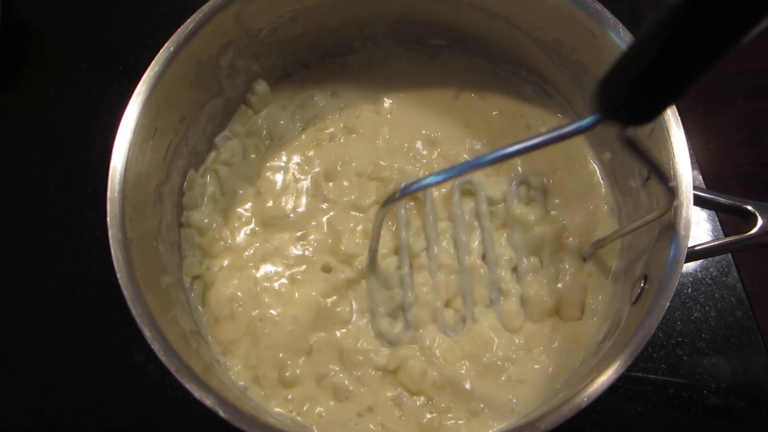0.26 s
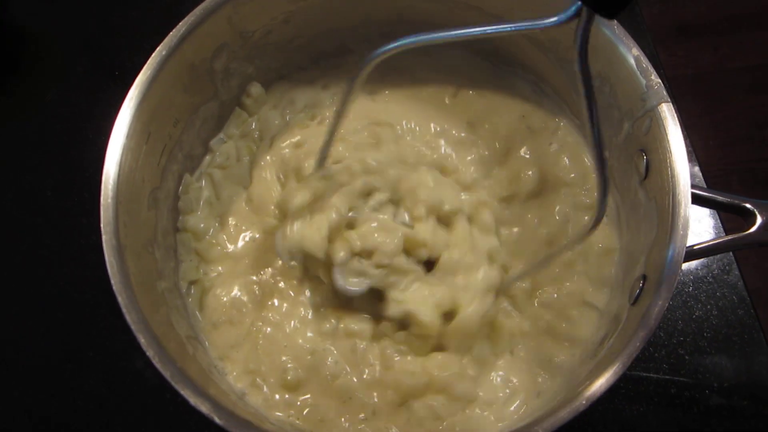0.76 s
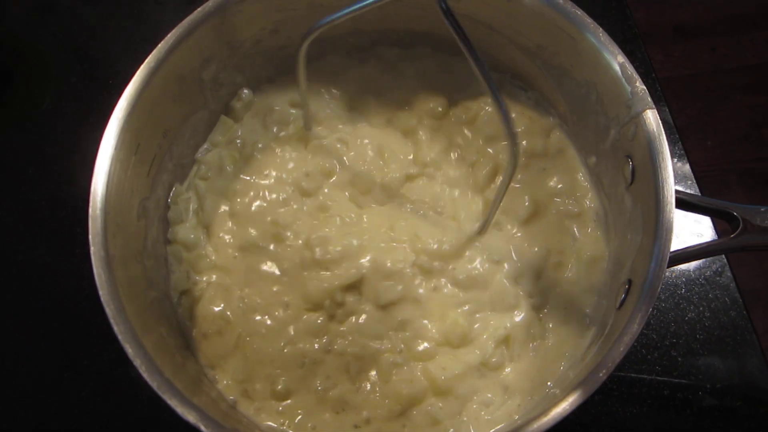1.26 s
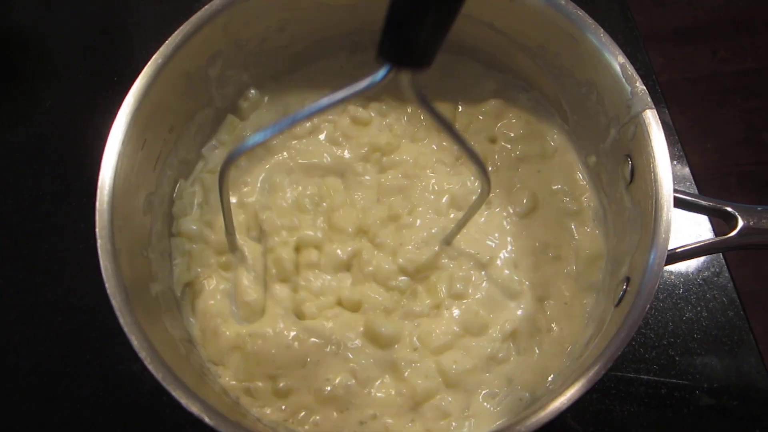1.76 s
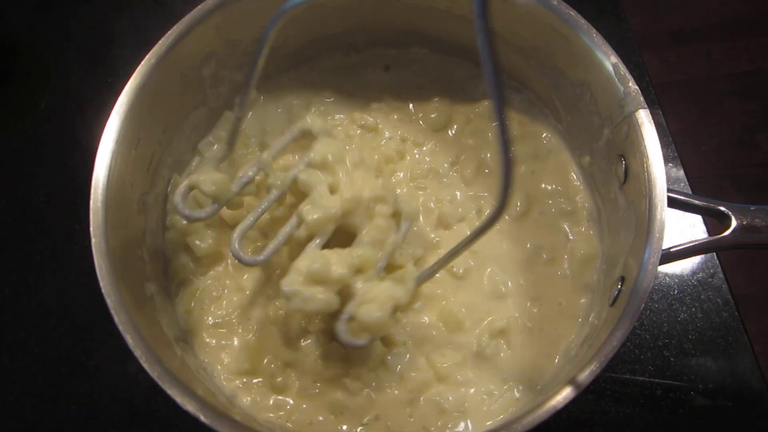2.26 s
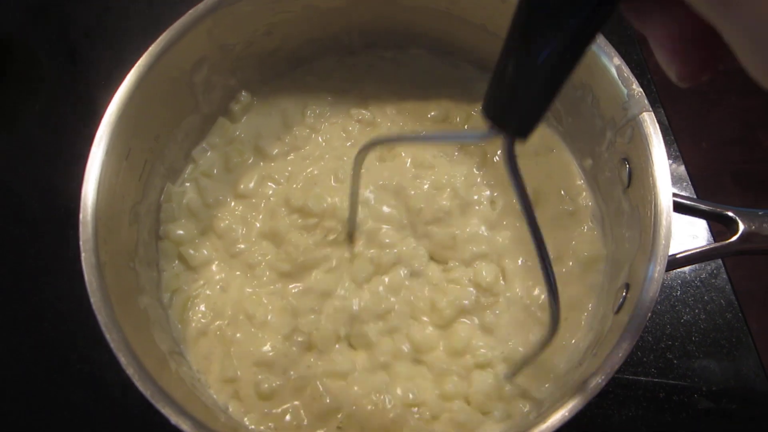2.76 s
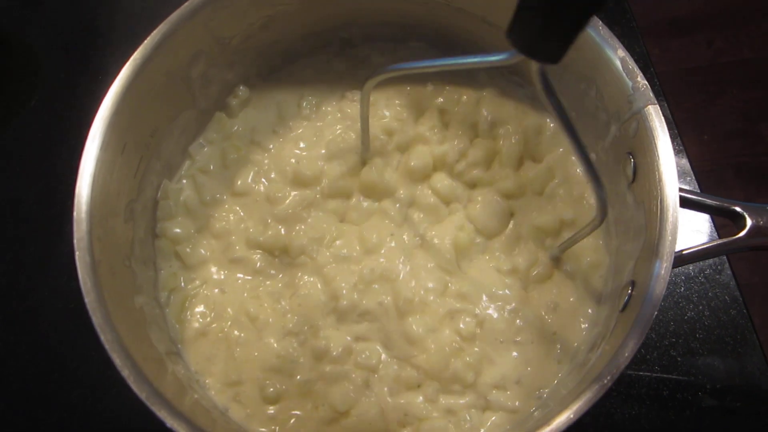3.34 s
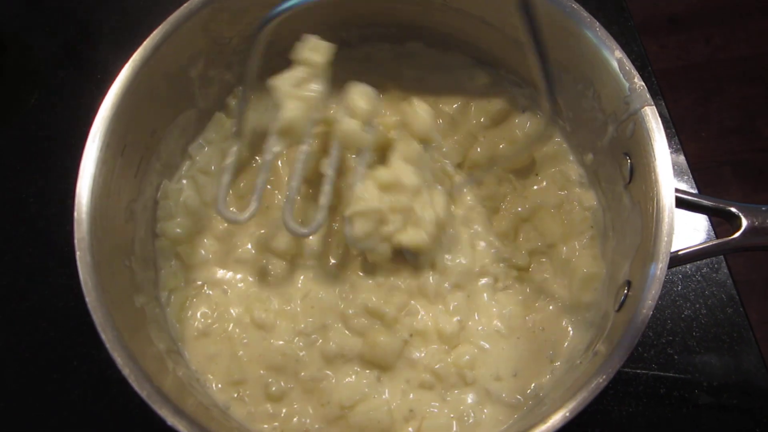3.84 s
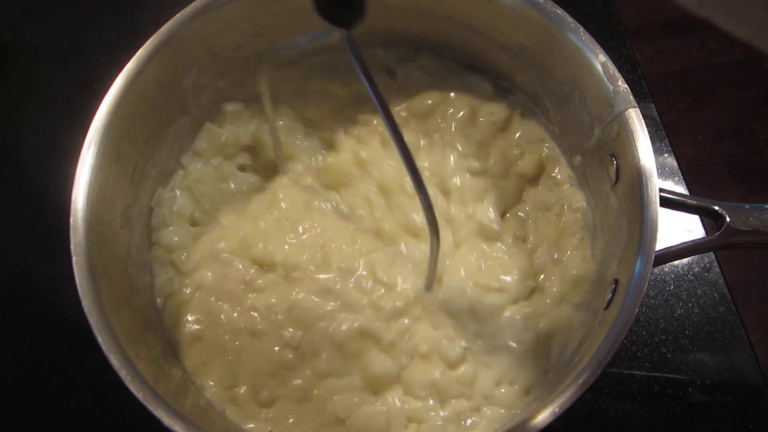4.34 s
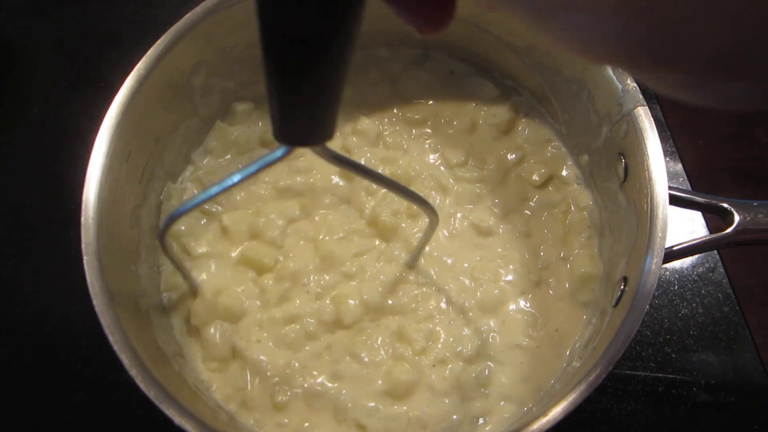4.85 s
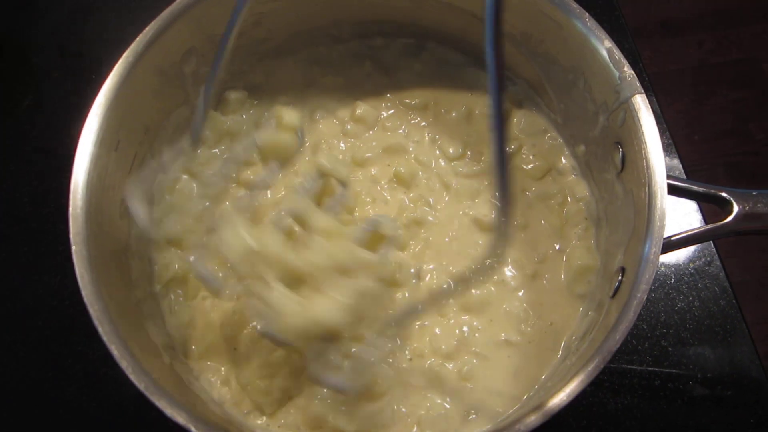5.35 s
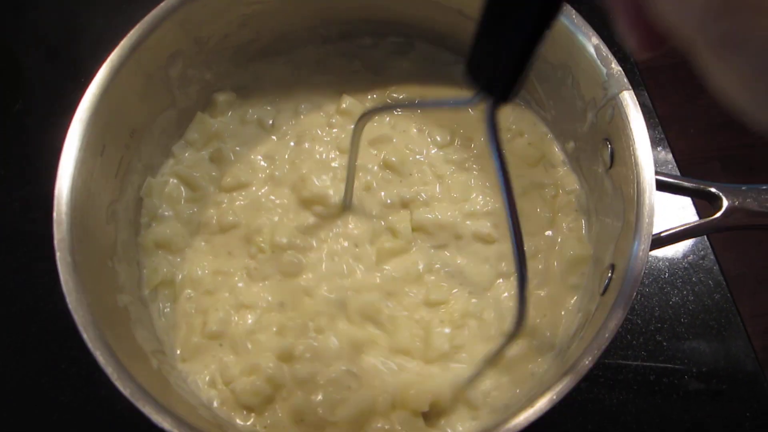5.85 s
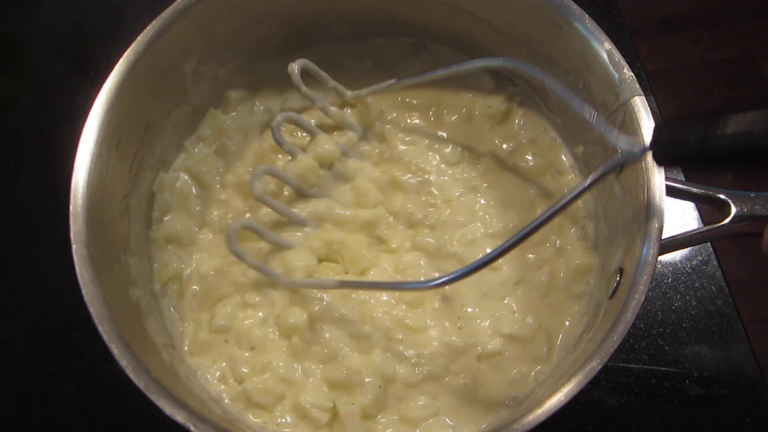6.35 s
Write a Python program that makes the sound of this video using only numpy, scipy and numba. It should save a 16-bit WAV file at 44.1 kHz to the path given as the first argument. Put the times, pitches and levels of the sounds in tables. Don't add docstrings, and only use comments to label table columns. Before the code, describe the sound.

Bright clanks of wire on a pan wall come roughly every half second to a second, the loudest near the start, the middle and late. Between them are swelling scrapes, wet smacks, small bubbling pops and soft thuds through heavy mash. One tiny squeak comes before five seconds. Close microphone, short room tail, steady appliance hum and broad hiss underneath.

```python
import sys
import numpy as np
from scipy import signal
from scipy.fft import rfft, irfft
from scipy.io import wavfile
from scipy.ndimage import uniform_filter1d
from numba import njit

SR = 44100
rng = np.random.default_rng(int(sys.argv[2]) if len(sys.argv) > 2 else 0)


def how_loud(loudness_db):
    steps = np.asarray(loudness_db, float) / 20
    return 10 ** steps


def bounce(signal):
    frames = np.transpose(np.atleast_2d(signal))
    limited = np.clip(frames, -1, 1)
    pcm = np.round(limited * 32767).astype(np.int16)
    wavfile.write(sys.argv[1], SR, pcm)


N = 291501

# frequency in Hz, level in dB.
HUM = [(59.2, -66), (236.9, -53), (296.1, -61), (414.5, -68.5), (1128, -66.5)]
# frequency in Hz, density in dB per Hz.
AIR = [(15, -43), (25, -0.5), (182, -1), (238, 0.5), (349, -3), (746, -14), (1430, -11), (2040, -13.5),
       (4990, -19.5), (11900, -24.5), (15500, -34), (17500, -31)]
# time in seconds, level in dB.
RECOVERY = [
    (0.181, 2.5),
    (.3, -1.5),
    (1, 2.5),
    (2.4, 3),
    (2.5, -1.5),
    (3.2, -1),
    (4.3, -0.5),
    (5.4, -0.5),
    (6.61, -1.5),
]

# frequency in Hz, level in dB, T60 in seconds.
WALL_MODES = [(754, -11, .4), (1100, -10, .35), (1174, -13, .3), (1351, -13, .28), (1631, -16, .3),
              (1825, -10, .14), (2030, -16, .15), (2062, -3, .45), (2622, -9, .14), (2800, -13, .12),
              (3240, -12, .12), (3801, -14, .2), (4124, -16, .22), (5168, -17, .25), (7133, -20, .18),
              (7870, -18, .2), (8721, -20, .15), (9981, -22, .15)]
# frequency in Hz, width in Hz, level in dB.
GRID_MODES = [(3800, 39, -11), (5060, 300, 8.5), (5340, 180, -5.5), (6340, 700, 7), (7000, 290, -9),
              (7670, 210, 7), (8225, 180, 8), (9030, 150, 8.5), (9920, 260, 8), (10400, 150, -10.5),
              (11400, 140, -0.5), (12880, 140, -4)]
# frequency in Hz, width in Hz, level in dB.
RUB_MODES = [(2020, 91, -21), (1980, 48, 10), (2400, 30, -3.5), (3000, 82, -6.5), (3196, 110, 7.5)]
# frequency in Hz, width in Hz, level in dB.
BOTTOM_MODES = [(696, 190, 3), (1000, 370, -6)]

# time in seconds, level in dB.
STIR = [(0.0, -56.5), (1.97, -52), (2.34, -59), (2.69, -48), (2.93, -59), (3.24, -61.5), (3.44, -56.5),
        (3.96, -57.5), (4.23, -47.5), (4.51, -58.5), (4.82, -55.5), (5.43, -59.5), (5.71, -54.5),
        (5.96, -68), (6.61, -55.5)]
# peak time in seconds, build-up in seconds, release in seconds, hiss in dB, wall share in dB.
PRESSES = [(0.491, .03, 0.0067, -35.5, -8.5), (0.569, 0.027, 0.045, -42.5, 0.5),
           (1.195, 0.06, 0.023, -39.5, 3), (1.255, 0.04, 0.032, -28, 5), (1.973, 0.037, 0.038, -34, 11),
           (2.095, 0.03, 0.0052, -48, -7), (2.638, 0.028, 0.03, -39, -5.5), (2.696, 0.051, .003, -43, -2),
           (2.877, 0.17, 0.016, -42, -0.5), (3.608, 0.15, 0.1, -48, 2), (4.283, 0.014, 0.0072, -35, -14),
           (4.2979, 0.014, 0.0085, -18.5, -7), (4.726, 0.012, 0.062, -53.5, 11.5),
           (4.945, 0.042, 0.034, -40, 1), (4.956, 0.0093, .03, -49.5, 15), (5.587, 0.015, 0.015, -22.5, -8),
           (5.855, 0.039, 0.047, -42, 2.5), (6.346, .02, 0.12, -47, -4.5)]
# start in seconds, length in seconds, hiss in dB, loss over the slide in dB, wall share in dB.
SLIDES = [(0.196, 0.12, -45.5, 13, 9.5), (0.947, 0.058, -58.5, -7.5, 2.5), (1.146, 0.053, -51.5, 5, -2),
          (1.202, 0.044, -45.5, 7, 12.5), (1.605, 0.089, -65, 1.5, 5), (1.872, 0.066, -56, -6.5, 10.5),
          (1.987, 0.13, -50, 11, -5), (2.448, 0.16, -42, 10.5, -0.5), (2.74, 0.045, -72, 7, 10),
          (3.22, 0.13, -40, 13, -7), (3.445, 0.036, -48, -3, 1.5), (4.055, 0.12, -61.5, -13.5, -3),
          (4.188, 0.097, -51, -11, -1.5), (4.336, 0.062, -42.5, 32, 2), (4.802, 0.05, -65, 3, 12),
          (4.997, 0.038, -57.5, 1, 14), (5.451, 0.1, -38.5, 17, 5), (5.769, 0.039, -45.5, 0.5, 5.5),
          (6.264, 0.11, -48, 3, -0.5), (6.524, 0.08, -48.5, 21.5, 8)]
# start in seconds, brightest Hz, tip sizzle in dB.
PLACES = [(0, 4500, 4.5), (.45, 4350, 2), (.55, 6170, 0.5), (.9, 6300, 2), (1.15, 8400, 5),
          (1.2, 7640, 0.5), (1.6, 7000, 6), (1.86, 6600, 5), (1.985, 5200, -5), (2.07, 9800, 1.5),
          (2.44, 4000, -1), (2.6, 6400, -2), (2.7, 9530, -1.5), (3.2, 3970, -4.5), (3.4, 7000, -0.5),
          (3.5, 7350, -4), (4.04, 7000, -0.5), (4.18, 10200, 0.5), (4.26, 6160, 0), (4.33, 5500, -7),
          (4.7, 5800, 8.5), (4.89, 10300, 1), (4.99, 7000, 5), (5.44, 4200, 0.5), (5.54, 6050, -9),
          (5.76, 4930, -9), (5.8, 7200, 0.5), (6.26, 6550, 3), (6.32, 8000, -6), (6.5, 5000, -0.5)]

# start in seconds, peak in dB, pitch
# in Hz.
CRACKLES = [(0.052, -40, 4120), (0.1066, -30.5, 4100), (0.13, -39.5, 3800), (0.623, -34, 7200),
            (0.8203, -31.5, 5550), (0.879, -40.5, 5700), (1.4145, -31.5, 4280), (1.45, -29.5, 3480),
            (1.485, -31, 3840), (1.5285, -38, 3580), (1.6017, -36, 9000), (1.667, -30.5, 7360),
            (1.8487, -30.5, 5600), (2.0367, -15.5, 4500), (2.0674, -24, 6300), (2.161, -31, 10000),
            (2.312, -28.5, 5230), (2.3394, -33.5, 5160), (2.357, -35.5, 4600), (2.9604, -37.5, 5390),
            (3.0508, -32.5, 4200), (3.9193, -33, 7000), (4.5505, -33, 6200), (5.155, -48, 11000),
            (5.363, -39, 4500), (6.004, -42, 4500), (0.4589, -41, 6280), (0.8614, -49, 5000),
            (1.0435, -38, 4000), (1.708, -37, 4000), (2.181, -44, 9500), (2.188, -38, 3000),
            (2.296, -49.5, 12000), (2.363, -34, 6000), (2.521, -41, 13000), (3.7628, -43, 5000),
            (3.8097, -38.5, 13000), (4.1465, -32, 6440), (4.5376, -36, 3310), (5.008, -29.5, 2860),
            (5.257, -46, 11000), (5.356, -52, 8000), (5.368, -43, 9000), (5.437, -33, 6000),
            (5.789, -24, 7000), (5.941, -57, 12000), (5.97, -53, 10500), (5.982, -46, 12500),
            (5.997, -50, 12000),
            (0.1762, -32, 4800), (0.18, -29, 5200), (0.962, -24.5, 2400), (0.979, -22, 6270),
           (0.993, -22, 7000), (3.203, -49, 10000), (4.453, -29.5, 4160), (4.721, -30.5, 2870),
           (4.74, -39, 3980), (5.678, -60, 2200), (6.239, -43, 5120),
            (1.4, -36, 4000), (1.42, -39, 9900), (1.436, -42, 13000), (1.5035, -44, 5000), (1.508, -46, 10500),
         (1.535, -36, 3000), (1.54, -38, 11000), (1.545, -47, 3520), (1.606, -37, 8500),
         (1.611, -41, 13000), (1.6183, -35, 4370), (1.626, -44, 10000), (1.639, -34, 3320),
         (1.65, -34, 11000), (1.657, -35, 2500), (1.673, -47, 12000), (1.681, -32, 2450),
         (1.6846, -41, 4500), (1.725, -41, 5500), (1.737, -42, 5000), (4.003, -42, 9000),
         (4.008, -41, 11000), (4.4148, -36, 7000), (4.427, -41, 7500), (4.462, -42, 13500),
         (4.476, -39, 14000), (4.481, -38, 11000), (4.561, -37, 7000), (4.568, -39, 5900),
         (4.618, -40, 12000), (4.6413, -44, 3000), (4.694, -41, 9900), (4.76, -42, 7000),
         (4.779, -35, 6500), (4.892, -46, 5000), (2.654, -22, 2610), (2.757, -41.5, 9000),
         (2.762, -41.5, 13000), (2.918, -42.5, 9000), (2.941, -43.5, 12000), (3.677, -37, 9500),
         (3.722, -49, 13000)]
# start in seconds, peak in dB.
POPS = [(0.788, -35.5), (1.5658, -34.5), (1.634, -35), (2.241, -33), (3.1104, -34), (3.735, -35.5),
        (3.781, -37), (3.847, -36), (4.589, -36), (4.609, -38), (4.693, -40), (4.849, -37), (5.24, -42),
        (5.325, -37), (5.396, -38)]
# start in seconds, length in seconds, film count.
LIFTS = [
    (0, .18, 8),
    (.945, .1, 16),
    (1.38, .37, 16),
    (3.7, .25, 5),
    (4.4, .3, 8),
]

# start in seconds, peak in dB, brightest Hz, dull share in dB, wall ring in dB.
KNOCKS = [(0.194, 2.5, 4570, -25.5, -28.5), (0.3401, -4.5, 7600, -44, -32), (1.2624, -4, 8800, -41, -22),
          (1.9872, -9.5, 9400, -42, -18), (2.4273, 5, 7640, -54, -17), (2.9012, -12, 12000, -30, -31.5),
          (3.2068, 3, 8240, -54, -18), (3.5124, -7, 9500, -14.5, -26), (4.0358, -11.5, 6400, -10, -22),
          (4.3337, -2.5, 9600, -31, -26), (4.342, -7, 9300, -8, -49), (4.7877, -8, 8600, -63, -21.5),
          (5.449, -0.5, 3800, -19, -20), (6.2573, -3, 8500, -21.5, -31)]
# start in seconds, peak in dB, dull share in dB, wall ring in dB.
TAPS = [(0.519, -17.5, -9.5, -10), (0.5368, -13, -9, -12), (1.1439, -13.5, -8, -13),
        (1.7686, -14.5, -12, -15.5), (2.543, -18.5, -2.5, -10.5), (2.7222, -21, -2, -17),
        (2.7738, -19.5, -6, -15), (3.3483, -15.5, -14.5, -18.5), (3.482, -27, -14, -8.5),
        (3.6, -24, 2, -17), (4.1094, -25, -34, -8.5), (5.5665, -19, -12, -9), (5.7768, -13, -21, -11.5),
        (6.354, -20.5, -28.5, -8.5), (6.364, -29, -18, -6), (6.5235, -19, -14, -9)]
# start in seconds, peak in dB, dull share in dB, wall ring in dB.
SMACKS = [(0.295, -32, -11, -16), (0.9498, -25.5, -23, -11.5), (1.204, -18.5, 0.5, -2),
          (1.693, -44, 11, -15), (1.803, -45, 4, -18.5), (2.7143, -14.5, -9, -11.5), (3.46, -25, -27, -2),
          (3.588, -21, 3.5, -7.5), (3.9926, -23, -30, -16), (4.468, -30, 3.5, -27), (4.8044, -33, 8, -30.5),
          (4.9514, -20.5, -13, -12.5), (5.4277, -23.5, -13, -21), (5.725, -25.5, 7, 3),
          (5.7391, -10.5, -5.5, -10.5)]
SMACK_HZ = 2750

# start in seconds, peak in dB, pitch in Hz, T60 in seconds.
THUDS = [(0.197, -21, 995, 0.025), (0.591, -30, 730, 0.021), (1.08, -33, 740, 0.029),
         (1.201, -30.5, 1173, 0.18), (1.245, -24.5, 1183, 0.069), (1.333, -27.5, 756, 0.033),
         (1.695, -30, 624, 0.042), (1.767, -29.5, 1240, 0.022), (1.804, -24, 1070, 0.011),
         (1.96, -29.5, 1200, 0.13), (1.989, -26.5, 1250, 0.021), (2.43, -26.5, 1030, 0.14),
         (2.714, -17.5, 1120, 0.016), (2.823, -30, 682, 0.049), (3.208, -27, 749.4, 0.19),
         (3.532, -32.5, 625, 0.036), (3.586, -20.5, 782, 0.03), (3.597, -21.5, 733, 0.058),
         (4.213, -35.5, 1140, 0.013), (4.335, -24.5, 1220, 0.017), (4.791, -32.5, 723, 0.11),
         (4.834, -31, 1130, 0.016), (4.951, -29.5, 1177, 0.046), (5.176, -42, 704, 0.075),
         (5.515, -27, 687, 0.035), (5.724, -17, 656, 0.048), (5.742, -10.5, 720, 0.022),
         (5.792, -23, 780, 0.03), (6.26, -26, 1015, 0.038), (6.522, -30, 696, 0.12)]
# start in seconds, peak in dB, T60 in seconds.
BUMPS = [
    (1.241, -39, 0.34),
    (2.715, -29.5, 0.19),
    (3.212, -44, 0.087),
    (4.336, -35.5, 0.13),
    (5.74, -27.5, 0.34),
]
# time in seconds, pitch in Hz, level in dB.
SQUEAK = [
    (4.69, 715, -65),
    (4.75, 731, -31.5),
    (4.765, 780, -37.5),
]


def level(x, db):
    return x * how_loud(db) / np.sqrt(np.mean(x ** 2))


def band(x, hz, width_hz):
    centre = min(hz, 0.42 * SR)
    sharpness = max(hz / width_hz, 0.4)
    return signal.lfilter(*signal.iirpeak(centre, sharpness, fs=SR), x)


def span(x, lo_hz, hi_hz):
    return signal.sosfilt(signal.butter(3, [lo_hz, hi_hz], "bandpass", fs=SR, output="sos"), x)


def fade(t, t60):
    return np.exp(-np.log(1000) * t / max(t60, 0.002))


def add(out, s, x, db):
    i = int(s * SR)
    x = x[:N - i]
    out[i:i + len(x)] += how_loud(db) * x / np.max(np.abs(x))


def walk(rate):
    k = int(SR / rate)
    held = np.repeat(np.clip(rng.standard_normal(N // k + 1), -1.5, 1.5), k)
    return 2.43 * uniform_filter1d(uniform_filter1d(held, k), k)[:N]


def kitchen_air():
    t = np.arange(N) / SR
    lines = sum(how_loud(db - 0.5 + 0.5 * walk(14)) * np.sin(2 * np.pi * f * t + 0.089 * walk(3.2)) for f, db in HUM)
    hz, db = np.transpose(AIR)
    bin_hz = np.arange(N // 2 + 1) * SR / N
    shape = how_loud(np.interp(np.log(bin_hz + 1), np.log(hz), db))
    rush = irfft(rfft(rng.standard_normal(N)) * shape, N)
    return lines + how_loud(1.5 * walk(6.3)) * level(rush, -58)


def grit(rate, flicker_db):
    size = how_loud(3 * np.minimum(rng.exponential(size=N), 3))
    slips = (rng.random(N) < rate / SR) * rng.standard_normal(N) * size
    smooth = 0.64 * rng.standard_normal(N)
    return how_loud(flicker_db * walk(90)) * (level(slips, 0) + smooth)


def spot(lo_hz, hi_hz, count=40):
    t = np.arange(3000) / SR
    hz = lo_hz * (hi_hz / lo_hz) ** rng.random((count, 1))
    modes = np.sin(2 * np.pi * hz * t)
    ring = rng.standard_normal(count) @ modes * fade(t, 0.02)
    return ring / np.sqrt(np.sum(ring ** 2))


def body(x, peaks, lo_hz, hi_hz, between_db, patchy_db):
    modes = sum(how_loud(db + patchy_db * walk(18)) * band(x, f, 1.4 * w)
                for f, w, db in peaks if lo_hz < f < hi_hz)
    dense = sum(signal.oaconvolve(how_loud(patchy_db * walk(15)) * x, spot(lo_hz, hi_hz))[:N] for _ in range(5))
    return level(span(modes + how_loud(between_db - 20) * dense, lo_hz, hi_hz), 0)


def strokes():
    swell_db = 18
    rows = []
    for s, up, down, db, wall_db in PRESSES:
        rows.append(([s - up, s, s + down], [db - swell_db, db, db - swell_db], wall_db))
    for s, length, db, loss, wall_db in SLIDES:
        rows.append(([s, s + length], [db, db - loss], wall_db))
    return rows


def drag():
    t, out = np.arange(N) / SR, np.zeros(N)
    touch_s, lift_s = 0.0051, 0.0063
    slips = grit(5000, 1.5)
    hiss = body(slips, GRID_MODES, 3600, 7970, 1, 2.5)
    sizzle = body(slips, GRID_MODES, 7500, 16000, -2, 2.5)
    rub = body(grit(1500, 2), RUB_MODES, 1600, 3900, 1, 2.5)
    mutter = body(grit(1200, 0.6), BOTTOM_MODES, 471, 1250, -7, 1.5)
    for s, db, wall_db in strokes():
        near = slice(int((s[0] - touch_s) * SR), int((s[-1] + lift_s) * SR))
        landing = (t[near] - s[0]) / touch_s + 1
        lifting = (s[-1] - t[near]) / lift_s + 1
        touch = np.clip(np.minimum(landing, lifting), 0, 1)
        hiss_db = np.interp(t[near], s, db)
        middle = (s[0] + s[-1]) / 2
        _, hz, tip_db = [row for row in PLACES if row[0] <= middle][-1]
        sizzle_db = -3.5 + tip_db + 0.21 * (hiss_db + 50.5)
        wire = level(hiss[near], 0) + how_loud(sizzle_db) * level(sizzle[near], 0)
        wire = how_loud(-3.5) * (wire + how_loud(4) * band(wire, hz, 0.2 * hz))
        out[near] += touch * how_loud(hiss_db) * (wire + how_loud(wall_db) * level(rub[near], 0))
    return out + how_loud(np.interp(t, *np.transpose(STIR))) * mutter


def crackles():
    chance = rng.random((120, 3))
    faint_s = chance[:, 0] * (N / SR - 0.02)
    faint = np.c_[faint_s, -55 + 12 * chance[:, 1] ** 2, 2500 * 5 ** chance[:, 2]]
    torn_s = np.concatenate([s + length * rng.random(films) for s, length, films in LIFTS])
    chance = rng.random((len(torn_s), 2))
    torn = np.c_[torn_s, -48 + 11 * chance[:, 0] ** 2, 2200 * 5 ** chance[:, 1]]
    pockets = [(s, db, 2720) for s, db in POPS]
    bursts = [*CRACKLES, *pockets, *faint, *torn]
    out, t = np.zeros(N), np.arange(600) / SR
    for s, db, hz in bursts:
        push = rng.standard_normal(len(t)) * fade(t, 0.0058)
        pitched = band(band(push, hz, 0.8 * hz), hz, 0.8 * hz)
        add(out, s, span(pitched + how_loud(-15) * push, 1300, 16000), db)
    return out


def contacts():
    rows = [(s, db, hz, dull, 0.032, ring) for s, db, hz, dull, ring in KNOCKS]
    rows += [(s, db, 7600, dull, 0.027, ring) for s, db, dull, ring in TAPS]
    return rows + [(s, db, SMACK_HZ, dull, 0.036, ring) for s, db, dull, ring in SMACKS]


def ticks():
    out, t, long = np.zeros(N), np.arange(4096) / SR, np.arange(16000) / SR
    f, mode_db, mode_t60 = np.transpose(WALL_MODES)
    decay = np.exp(-np.log(1000) * long / mode_t60[:, None])
    ring = np.sin(2 * np.pi * f[:, None] * long) * decay
    grip = np.exp(-(long / 0.09) ** 3)
    for s, db, hz, low_db, t60, ring_db in contacts():
        smack = hz == SMACK_HZ
        envelope = fade(t, 0.46 * t60) + how_loud(-3.5) * fade(t, t60) + how_loud(10.5) * fade(t, 0.0039)
        push = rng.standard_normal(len(t)) * envelope * np.minimum(t / 0.00015, 1)

        grid_place = rng.standard_normal(len(GRID_MODES))
        wall_place = rng.standard_normal(len(WALL_MODES))
        grid = sum(how_loud(d + 2.1 * q) * band(push, g, w) for (g, w, d), q in zip(GRID_MODES, grid_place))
        treble = how_loud(-10 * smack) * (how_loud(-10.5) * grid + how_loud(-11) * push)
        add(out, s, span(band(push, hz, 0.5 * hz) + treble, 1700, 14000), db)
        add(out, s, span(push, 1960, 3590), db + low_db)

        speak = np.sign(wall_place) * how_loud(mode_db + 2.5 * wall_place - 20 * smack * (f > 4000))
        muffle = fade(long, 0.5 if db > -9 else 0.14)
        add(out, s, speak @ ring * muffle * grip * np.minimum(long / 0.00071, 1), db + ring_db)
    return out


def thuds():
    out, t = np.zeros(N), np.arange(8000) / SR
    for s, db, hz, t60 in THUDS:
        detune = 0.042 * rng.standard_normal(3) * [0, 1, 1]
        notes = hz * np.array([1, 0.82, 1.38]) * (1 + detune)
        tone = how_loud([0, -7, -8]) @ np.sin(2 * np.pi * notes[:, None] * t)
        add(out, s, tone * fade(t, t60) * (1 - np.exp(-t / 0.0015)), db)
        slap = rng.standard_normal(len(t)) * fade(t, 2 * t60)
        add(out, s, span(slap, 0.64 * hz, 1.96 * hz), db - 4)
    return out


def bumps():
    out, t = np.zeros(N), np.arange(16000) / SR
    for s, db, t60 in BUMPS:
        add(out, s, span(rng.standard_normal(len(t)) * fade(t, t60), 34.6, 900), db)
    return out


def squeak():
    s, hz, db = np.transpose(SQUEAK)
    t = np.arange(N) / SR
    phase = 2 * np.pi * np.cumsum(np.interp(t, s, hz)) / SR
    overtone_db = [6, -15, -19, -25, -34, -18]
    tone = sum(how_loud(d) * np.sin(k * phase) for k, d in enumerate(overtone_db, start=1))
    gate = np.clip(np.minimum(t - s[0], s[-1] - t) / 0.0013, 0, 1)
    return gate * how_loud(np.interp(t, s, db)) * tone


def reverberation(pan):
    t = np.arange(20000) / SR
    tail = band(rng.standard_normal(len(t)), 850, 5400) * fade(t, 0.46) * np.minimum(t / 0.016, 1)
    return signal.fftconvolve(pan, tail / np.sqrt(np.sum(tail ** 2)))[:N]


def scene():
    air = kitchen_air() * how_loud(np.interp(np.arange(N) / SR, *np.transpose(RECOVERY)))
    pan = drag() + crackles() + ticks() + thuds() + squeak()
    return (pan + how_loud(-17.5) * reverberation(pan) + air + bumps())[None]


@njit
def follow(x, attack, release):
    e, y = 0., np.empty(len(x))
    for i in range(len(x)):
        a = abs(x[i])
        e += (a - e) * (attack if a > e else release)
        y[i] = e
    return y


def top_cut(x):
    return signal.sosfilt(signal.butter(12, 17070, fs=SR, output="sos"), x)


def record(dry):
    attack_s, release_s = 0.008, 0.25
    peak = follow(dry[0], 1 / (attack_s * SR), 1 / (release_s * SR))
    gain = np.minimum(how_loud(-29.5) / (peak + 1e-9), 1) ** 0.22
    rounded = np.tanh(dry * gain / 0.95) * 0.95
    low_pass = signal.ellip(8, 0.5, 27, 15900, fs=SR, output="sos")
    return top_cut(signal.sosfilt(low_pass, rounded))


dry = scene()
out = record(dry)
bounce(out)
```